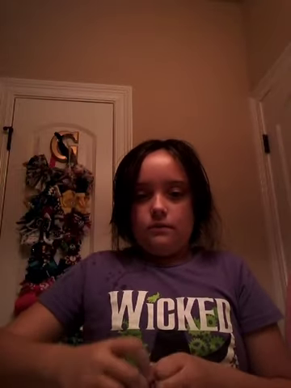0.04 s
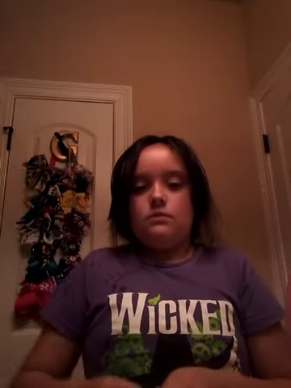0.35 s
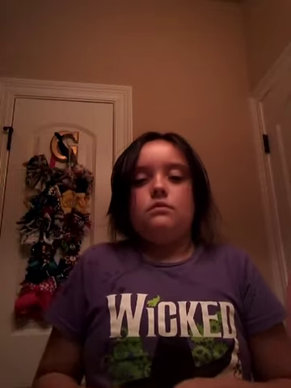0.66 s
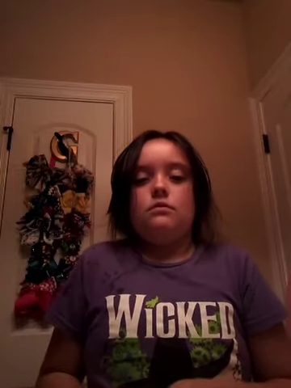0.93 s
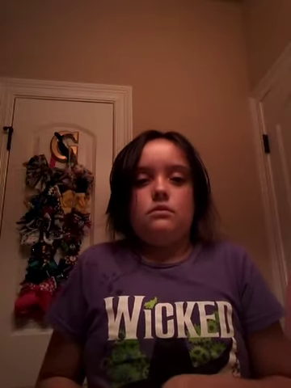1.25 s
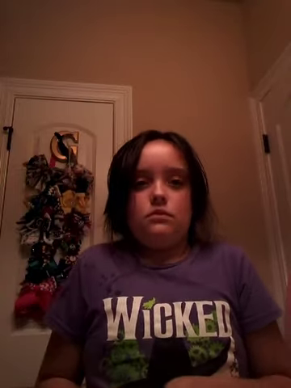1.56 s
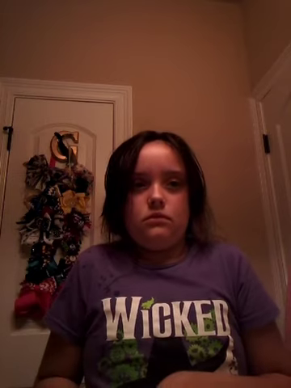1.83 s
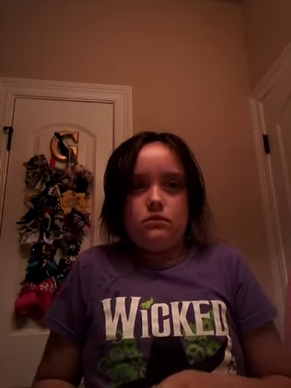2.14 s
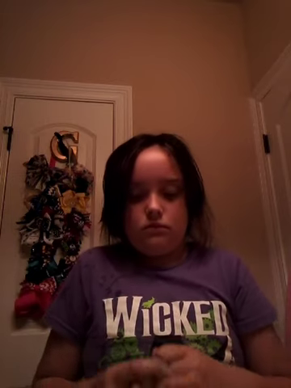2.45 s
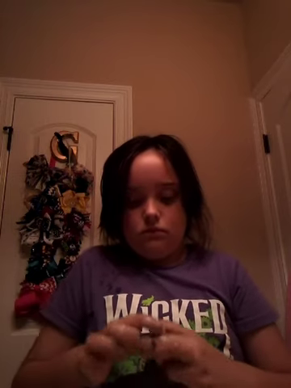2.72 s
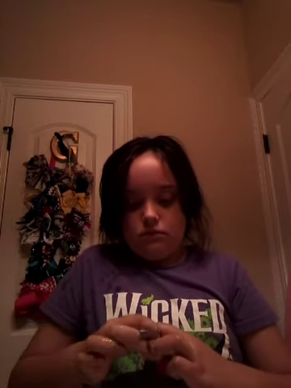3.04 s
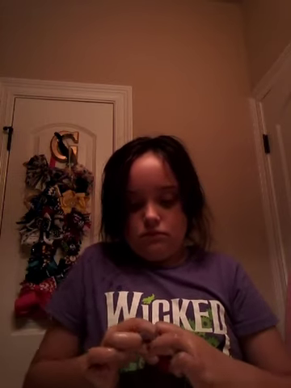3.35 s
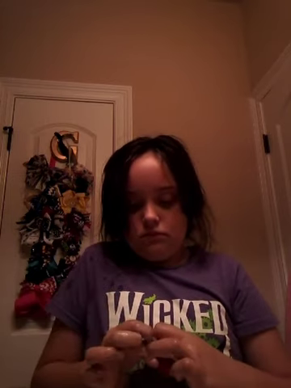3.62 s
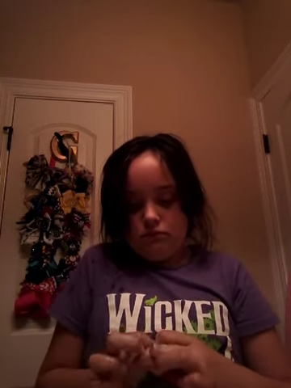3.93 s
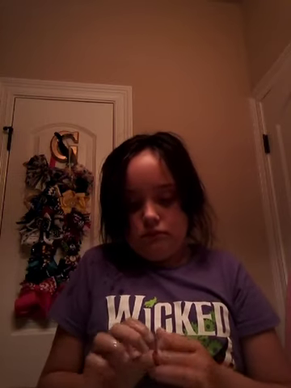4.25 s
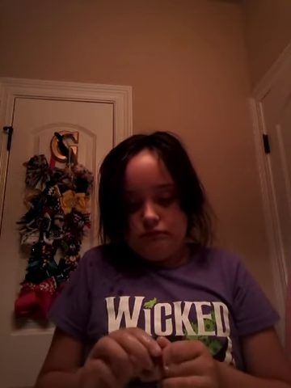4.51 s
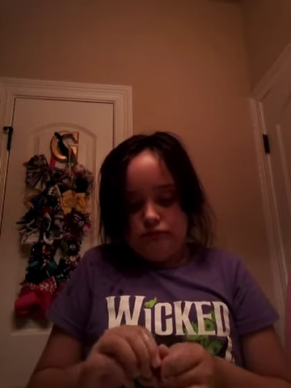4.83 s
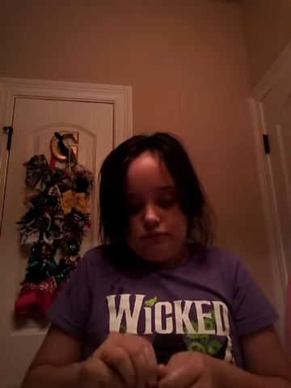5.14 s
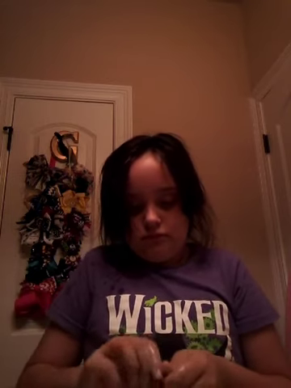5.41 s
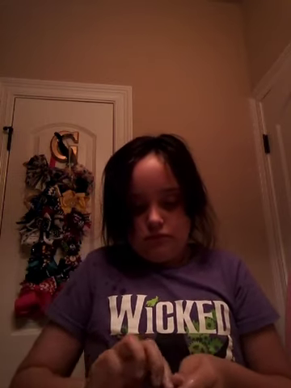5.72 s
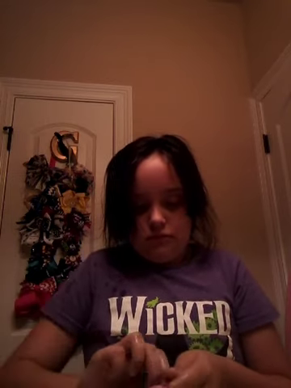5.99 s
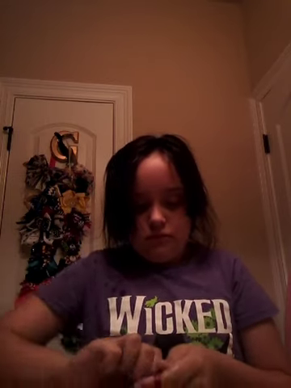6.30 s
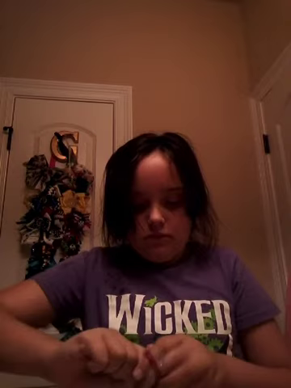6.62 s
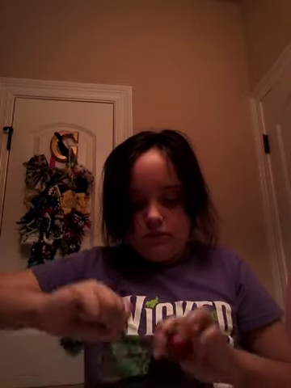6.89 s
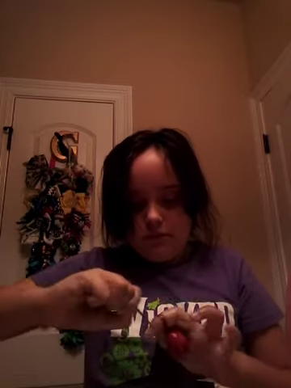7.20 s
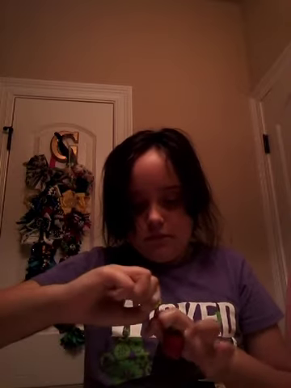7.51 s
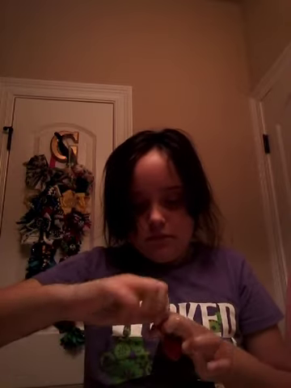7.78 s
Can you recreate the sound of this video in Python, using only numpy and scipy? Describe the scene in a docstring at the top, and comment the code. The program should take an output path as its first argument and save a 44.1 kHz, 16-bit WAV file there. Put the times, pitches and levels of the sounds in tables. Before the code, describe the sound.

A limp balloon is tied off in a quiet room: soft rubbing, tiny clicks and one hard rubber snap over faint hum and hiss.

```python
"""Fingers stretch a limp rubber balloon and wind it into a knot, close up in a small, bare room.
A low rumble, microphone hiss and a faint hum that swells now and then are there from the start.
Almost at once the rubber creeps over the skin in bursts of tiny slips and ticks as it lets go.
At 3.55 s the neck snaps back hard against the belly and sets the room ringing. The rubbing and
ticking go on, now with soft finger bumps, until about 6.9 s; the background plays out alone."""
import sys
import numpy as np
from scipy import signal
from scipy.fft import rfft, irfft
from scipy.io import wavfile

SR = 44100
rng = np.random.default_rng(int(sys.argv[2]) if len(sys.argv) > 2 else 0)


def generate_wav(sig):
    """Save sig (samples, or channels by samples) to the path in sys.argv[1] as 16-bit PCM at SR."""
    pcm = np.round(np.clip(np.atleast_2d(sig).T, -1, 1) * 32767).astype(np.int16)
    wavfile.write(sys.argv[1], SR, pcm)


N = 350595

# rumble of the still room: (frequency [Hz], relative level [dB])
RUMBLE_COLOUR = [(20, -31.5), (32, -22.5), (42, -10.5), (60, -4.5), (80, -2), (105, 1), (135, -4),
                 (165, -10.5), (260, -13), (340, -17), (600, -20.5), (1000, -27), (2000, -32.5),
                 (6000, -49.5)]
# low standing waves of the room: (frequency [Hz], relative level [dB])
ROOM_MODES = [(180, 6.5), (222, 6.5), (247, 6), (270, 5), (297, 6.5)]
# microphone hiss: (frequency [Hz], relative level [dB])
HISS_COLOUR = [(100, -8), (2500, -3.5), (5800, -5), (7000, -2.5), (7800, -4.5), (8700, -7), (10000, -2),
               (11500, -1), (12800, 1.5), (14000, 0), (14700, -3), (15000, 7), (15500, 6)]
# faint noise that differs between left and right: (frequency [Hz], relative level [dB])
SIDE_COLOUR = [(15, -34.5), (25, -2.5), (101, -5.5), (233, -6), (2490, -8), (3260, -13.5), (3930, -7),
               (15500, -2.5)]
# the hum between its swells: (time [s], level [dB])
HUM_BED = [(0, -77.5), (1.6, -75), (3.0, -72.5), (3.6, -86), (5.1, -87.5), (5.7, -74), (6.6, -89.5),
           (7.95, -81)]
# swells of the hum: (start [s], time until the fade [s], level [dB])
HUM_SWELLS = [(0.16, 0.058, -79), (0.485, 0.072, -72.5), (0.79, 0.46, -70), (0.966, 0.13, -64.5),
              (1.776, 0.077, -73), (1.999, 0.13, -55.5), (2.333, .22, -58), (2.726, .12, -70.5),
              (3.07, 0.27, -70.5), (3.772, .12, -69.5), (4.504, .24, -70.5), (7.555, 0.38, -77.5)]
# steady tones of the motor and the electronics: (frequency [Hz], level [dB])
STEADY_TONES = [(96.9, -77.5), (3176, -93), (6347, -98.5), (9523, -95.5), (12694, -94)]
# strokes of rubber creeping over skin: (start [s], length [s], relative level [dB], ring [Hz])
RUB_STROKES = [(0.097, .075, -73, 7100), (0.238, 0.034, -76, 7140), (0.362, .075, -70.5, 6030),
               (0.45, .18, -71, 7000), (1.41, .31, -85, 7350), (1.93, 0.16, -71.5, 6800),
               (2.974, 0.08, -83, 7200), (3.316, .21, -77.5, 4900), (3.455, 0.086, -68.5, 6800),
               (3.527, 0.0078, -49, 6900), (3.814, .18, -73, 6900), (4.05, 0.37, -77, 6600),
               (4.364, 0.086, -69.5, 5950), (4.46, .085, -70.5, 6940), (4.724, 0.071, -55, 6620),
               (4.997, .05, -71, 7200), (5.044, 0.064, -59.5, 7400), (5.113, 0.039, -68, 6500),
               (5.798, 0.18, -71.5, 6800), (5.9845, .006, -56, 8150), (5.998, .026, -64, 8200),
               (6.146, 0.078, -59.5, 6230), (6.214, 0.17, -74, 6300), (6.487, 0.33, -77, 6720)]
# one small slip of rubber: (frequency [Hz], relative level [dB])
SLIP_COLOUR = [(200, -28.5), (600, -25.5), (1500, -22), (2600, -22), (4000, -14), (5200, -8), (6600, -4),
               (7900, -2.5), (9000, -13.5), (10200, -11), (11500, -16.5), (13000, -20.5), (15500, -24)]
# how much the balloon's slack body sounds as the grip changes: (time [s], boost [dB])
SLACK_BOOST = [(0, -6), (2.4, -6), (3.0, 8), (3.35, 9.5), (3.5, -6), (4.4, 3), (4.75, -3.5), (5.03, 0),
               (5.13, 5), (6.1, 8.5), (6.9, 4)]
# rubber letting go: (time [s], relative level [dB], ring [Hz], relative room send [dB])
TICKS = [(0.1146, -54.5, 7700, -5), (0.2473, -38.5, 6900, 4.5), (0.524, -42, 7600, -2),
         (2.0178, -50, 6790, 6), (2.984, -54.5, 7040, 11.5), (3.3175, -53, 7750, 9),
         (3.437, -51.5, 6800, -1), (3.4755, -45, 6860, -10), (3.5253, -40.5, 6600, 13),
         (4.3774, -51, 7120, 7), (4.7315, -49, 6980, 7), (5.0296, -46, 7100, 9), (5.07, -45, 7300, 13),
         (5.8462, -48.5, 6940, 7), (5.9895, -31.5, 8230, 7), (6.1595, -47.5, 6830, 3), (6.88, -44, 7110, 4)]
# the hard snap: (time [s], level of the slap [dB])
SNAP = [(3.5515, -7.5)]
# the crack of the snap: (frequency [Hz], relative level [dB])
SNAP_COLOUR = [(150, -54.5), (400, -28), (700, -24), (1280, -27), (1800, -26), (2600, -21.5), (3600, -18.5),
               (5000, -10.5), (6600, 0), (7800, 0.5), (9000, -13), (9900, -8.5), (11300, -15.5),
               (13000, -18), (15500, -29)]
# the slack belly, rung by the snap: (frequency [Hz], level against the crack [dB], t60 [s])
BELLY_MODES = [(591, -56.5, 0.079), (660, -55.5, 0.063), (1220, -42.5, .035), (1370, -44.5, .03),
               (2320, -48, 0.011)]
# fingers bumping together: (time [s], relative level [dB])
FINGER_BUMPS = [(3.729, -57), (3.926, -52.5), (4.382, -53), (4.496, -60.5), (4.747, -52), (4.964, -57.5),
                (5.079, -56.5), (5.637, -55.5), (6.382, -56.5), (6.791, -57)]
# the dull knock of one bump: (frequency [Hz], relative level [dB])
BUMP_COLOUR = [(120, -20), (300, -11), (700, 4), (1500, -1.5), (3000, -6.5), (6000, -30), (15000, -38)]
# early reflections from table and walls: (delay [s], gain [linear])
EARLY_ECHOES = [(.0017, .11), (.0028, 0.14), (.0100, .10), (.0109, 0.17), (0.0135, .2), (.0140, 0.16),
                (.0313, .12)]
# decay of the room's tail: (frequency [Hz], t60 [s])
TAIL_T60 = [(200, 1), (1000, 0.33), (3000, 0.38), (6000, 0.42), (9000, 0.37), (15000, 0.25)]
# tone of the room's tail: (frequency [Hz], relative level [dB])
TAIL_COLOUR = [(200, 7), (1200, 4), (3000, 3), (6500, -1.5), (8000, -2.5), (10000, 3.5), (15000, 6)]


def amp(db):
    """Decibels to gain."""
    return 10 ** (np.asarray(db) / 20)


def unit(x):
    """Scales to rms 1."""
    return x / np.sqrt(np.mean(x ** 2) + 1e-20)


def read(points, hz):
    """Reads a curve on a log-frequency axis."""
    f, value = np.transpose(points)
    return np.interp(np.log(hz + 1), np.log(f + 1), value)


def add(mix, s, sound):
    """Lays a sound into the mix at time s."""
    part = mix[max(round(s * SR), 0):][:len(sound)]
    part += sound[:len(part)]


def noise(colour):
    """Steady noise of a given colour, rms 1."""
    gain = amp(read(colour, np.fft.rfftfreq(N, 1 / SR)))
    return unit(irfft(rfft(rng.standard_normal(N)) * gain, N))


def drift(rate_hz):
    """Slow random wandering, rms 1."""
    lowpass = np.exp(-(np.fft.rfftfreq(N, 1 / SR) / rate_hz) ** 2)
    return unit(irfft(rfft(rng.standard_normal(N)) * lowpass, N))


def standing_waves(x, width_hz=3.2, gap_db=-2.5):
    """The room lifts low noise at its modes and thins it between them."""
    hz = np.fft.rfftfreq(N, 1 / SR)
    lift = sum(db / (1 + ((hz - mode_hz) / width_hz) ** 2) for mode_hz, db in ROOM_MODES)
    between = (hz > ROOM_MODES[0][0]) & (hz < ROOM_MODES[-1][0])
    return irfft(rfft(x) * amp(lift + gap_db * between), N)


def room_tone(rumble_db=-67, hiss_db=-65):
    """The bed: low rumble shaped by the room's modes, with microphone hiss on top."""
    rumble = standing_waves(amp(rumble_db) * noise(RUMBLE_COLOUR))
    return rumble + amp(hiss_db) * noise(HISS_COLOUR)


def hum(pitch_hz=194.3, waver_hz=1.2, unsteady_db=1.5, flutter_db=-13, rise_s=0.088, fall_db_per_s=170.5):
    """A wavering low tone with a soft flutter; its swells rise, hold and die away."""
    t = np.arange(N) / SR
    level = amp(np.interp(t, *np.transpose(HUM_BED)) + unsteady_db * drift(5.9))
    for start, length, db in HUM_SWELLS:
        rise = np.sin(np.pi / 2 * np.clip((t - start) / rise_s, 0, 1)) ** 2
        level += rise * amp(db - fall_db_per_s * np.maximum(t - start - length, 0))
    tone = np.sqrt(2) * np.sin(2 * np.pi * np.cumsum(pitch_hz + waver_hz * drift(4)) / SR)
    flutter = noise([(130, -39.5), (190, 0), (260, -0.5), (320, -10.5), (420, -24), (900, -55),
                     (3000, -97)])
    return level * (tone + standing_waves(amp(flutter_db) * flutter))


def motor_and_electronics(wobble_rad=0.67):
    """A faint drone and thin whines, each drifting a little in phase."""
    t = np.arange(N) / SR
    return sum(amp(db) * np.sqrt(2) * np.sin(2 * np.pi * hz * t + wobble_rad * drift(3))
               for hz, db in STEADY_TONES)


def click(colour, boost_db=lambda hz: 0, size=1024):
    """A sharp-fronted (minimum-phase) click of peak 1, with an optional EQ curve over its colour."""
    hz = abs(np.fft.fftfreq(size, 1 / SR))
    log_gain = np.log(amp(read(colour, hz) + boost_db(hz)))
    pulse = np.fft.ifft(np.exp(np.conj(signal.hilbert(log_gain)))).real
    return pulse / abs(pulse).max()


def slip(s, ring_hz, ring_db, ring_width_hz=600, body_hz=3690, body_width_hz=1100):
    """One slip at time s: the bright ring of taut rubber over the lower body of slack rubber."""
    body_db = np.interp(s, *np.transpose(SLACK_BOOST))

    def boost_db(hz):
        ring = ring_db / (1 + ((hz - ring_hz) / ring_width_hz) ** 2)
        body = body_db / (1 + ((hz - body_hz) / body_width_hz) ** 4)
        return ring + body
    return click(SLIP_COLOUR, boost_db)


def rubs(slips_per_s=1100, uneven_db=4, trim_db=-2, press_share=0.22, ease_share=0.3):
    """Stick and slip: a swarm of uneven little slips as each stroke presses in and eases off."""
    out = np.zeros(N)
    slipping = rng.random(N) < slips_per_s / SR
    friction = slipping * amp(uneven_db * np.clip(rng.standard_normal(N), -2, 2))
    friction += 0.081 * rng.standard_normal(N)  # smooth sliding between the slips
    for s, length, db, ring_hz in RUB_STROKES:
        force = friction[round(s * SR):][:round(length * SR)]
        along = np.linspace(0, 1, len(force))
        pressure = np.minimum(along / press_share, (1 - along) / ease_share).clip(max=1)
        stroke = signal.fftconvolve(force * pressure, slip(s, ring_hz, ring_db=9))
        rms = np.sqrt(np.sum(stroke ** 2) / len(force) + 1e-20)
        add(out, s, amp(db + trim_db) * stroke / rms)
    return out


def ticks(trim_db=-2, send_trim_db=-3, chatter=0.16, chatter_s=0.0013, size=256):
    """The rubber lets go in single slips, each with a brief chatter; returns direct and room send."""
    direct, send, t = np.zeros(N), np.zeros(N), np.arange(size) / SR
    for s, db, ring_hz, send_db in TICKS:
        force = (t == 0) + chatter * rng.standard_normal(size) * np.exp(-t / chatter_s)
        tick = np.convolve(force, slip(s, ring_hz, ring_db=11))
        tick *= amp(db + trim_db) / abs(tick).max()
        add(direct, s, tick)
        add(send, s, amp(send_db + send_trim_db) * tick)
    return direct, send


def snap(slap_s=0.00046, release_db=-2, flap=0.1, flap_s=0.00172, send_db=4, size=3000):
    """The neck leaves the finger, slaps the belly and flaps briefly; returns direct and room send."""
    direct, send, t = np.zeros(N), np.zeros(N), np.arange(size) / SR
    crack = click(SNAP_COLOUR)
    flapping = np.convolve(crack, flap * rng.standard_normal(size) * np.exp(-t / flap_s))
    belly = sum(amp(db - 60 * t / t60) * np.sin(2 * np.pi * hz * t) for hz, db, t60 in BELLY_MODES)
    for s, db in SNAP:
        add(direct, s, amp(db + release_db) * crack)
        add(direct, s + slap_s, amp(db) * crack)
        add(direct, s + 2 * slap_s, amp(db) * flapping)
        add(send, s, amp(db + send_db) * crack)  # the room gets the three as one crack
        for path in (direct, send):
            add(path, s + slap_s, amp(db) * belly)
    return direct, send


def room_boom(trim_db=-73, t60=1.6, build_s=0.02, size=30000):
    """The snap leaves the room's low modes faintly ringing."""
    out, t = np.zeros(N), np.arange(size) / SR
    ring = sum(amp(db) * np.sin(2 * np.pi * (hz * t + rng.random())) for hz, db in ROOM_MODES)
    envelope = (1 - np.exp(-t / build_s)) * amp(-60 * t / t60)
    for s, db in SNAP:
        add(out, s, amp(db + trim_db) * envelope * ring)
    return out


def finger_bumps(trim_db=-5, scuff=0.11, scuff_s=0.0093, size=2600):
    """Dull, soft knocks of finger on finger, each dragging into a short scuff."""
    out, knock, t = np.zeros(N), click(BUMP_COLOUR), np.arange(size) / SR
    for s, db in FINGER_BUMPS:
        force = (t == 0) + scuff * rng.standard_normal(size) * np.exp(-t / scuff_s)
        add(out, s, amp(db + trim_db) * np.convolve(force, knock))
    return out


def reverb(send, tail_db=1.5, build_s=0.011, size=22050):
    """Early echoes from table and walls, then a dense tail that hangs on longest in the bass."""
    hz, t, spectrum = signal.stft(rng.standard_normal(size), SR, nperseg=256)
    decay_db = 60 * t / read(TAIL_T60, hz)[:, None]
    spectrum *= amp(read(TAIL_COLOUR, hz)[:, None] - decay_db)
    tail = signal.istft(spectrum, SR, nperseg=256)[1][:size]
    tail *= 1 - np.exp(-np.arange(size) / (build_s * SR))
    decay_energy = SR * read(TAIL_T60, 6000) / np.log(1e6)
    response = amp(tail_db) * tail / np.sqrt(decay_energy)
    for delay, gain in EARLY_ECHOES:
        response[round(delay * SR)] += gain
    return signal.fftconvolve(send, response)[:N]


def scene(bump_send_db=-1.5, side_db=-77.5):
    """The hands sit dead centre, so left and right share all but a faint noise."""
    tick, tick_send = ticks()
    crack, crack_send = snap()
    rubbing, bumps, bed = rubs(), finger_bumps(), room_tone()
    direct = rubbing + tick + crack + bumps
    send = rubbing + tick_send + crack_send + amp(bump_send_db) * bumps
    mid = direct + reverb(send) + room_boom() + bed + hum() + motor_and_electronics()
    side = amp(side_db) * noise(SIDE_COLOUR)
    return np.array([mid + side, mid - side])


def record(dry, cutoff_hz=15550):
    """A steep low-pass takes the very top off the mix."""
    lowpass = signal.firwin(511, cutoff_hz, window=("kaiser", 9), fs=SR)
    return signal.oaconvolve(dry, lowpass[None], "same")


dry = scene()
out = record(dry)
generate_wav(out)
```